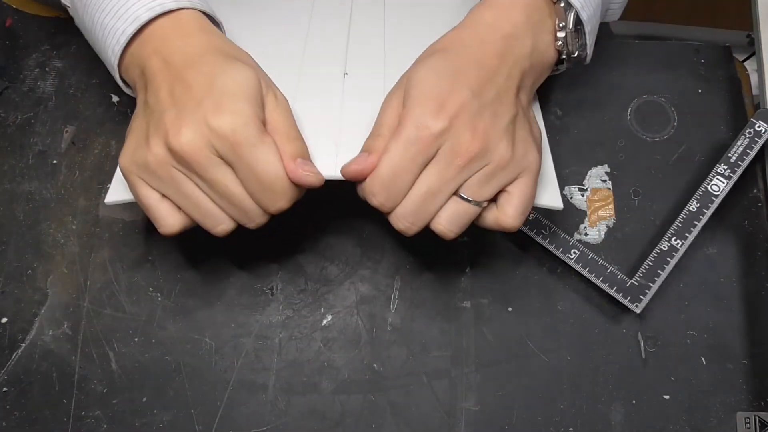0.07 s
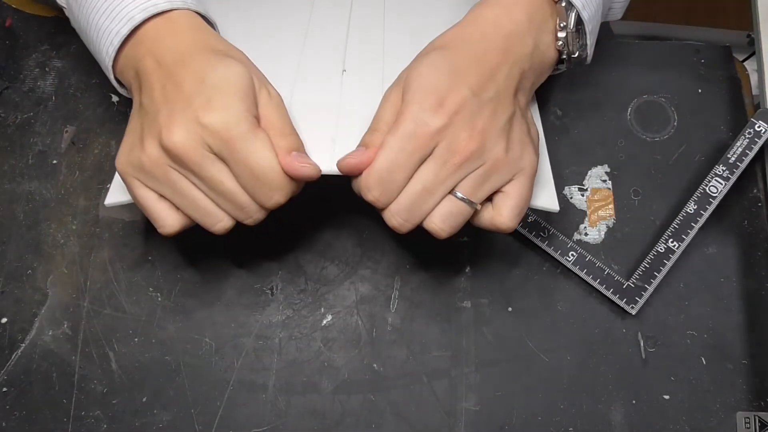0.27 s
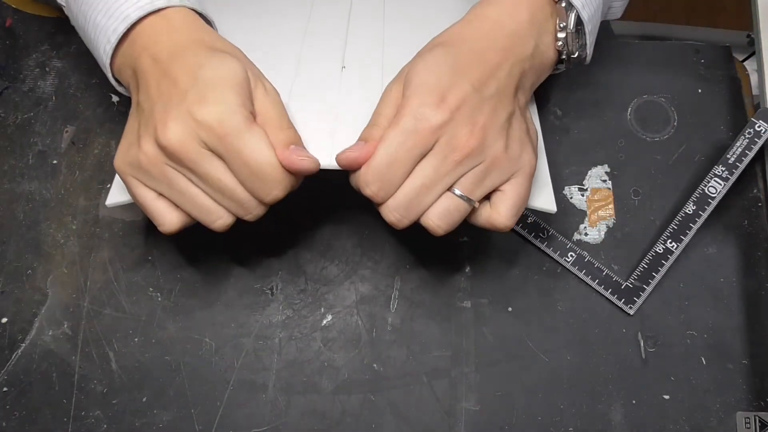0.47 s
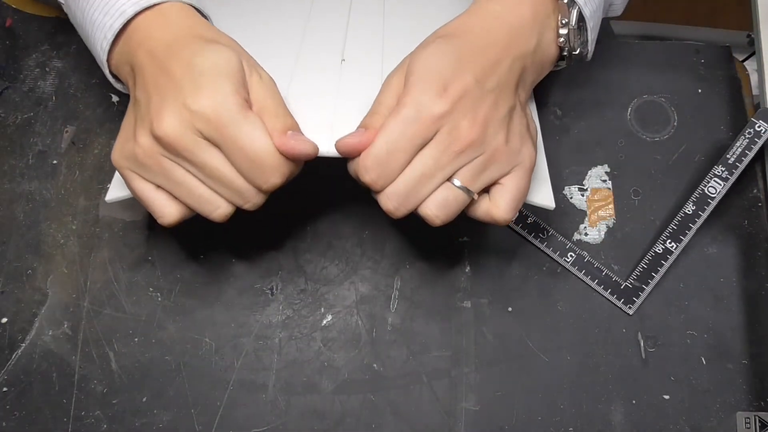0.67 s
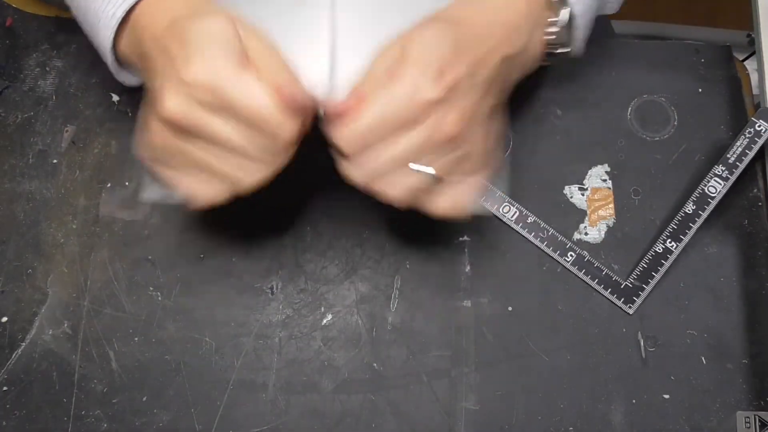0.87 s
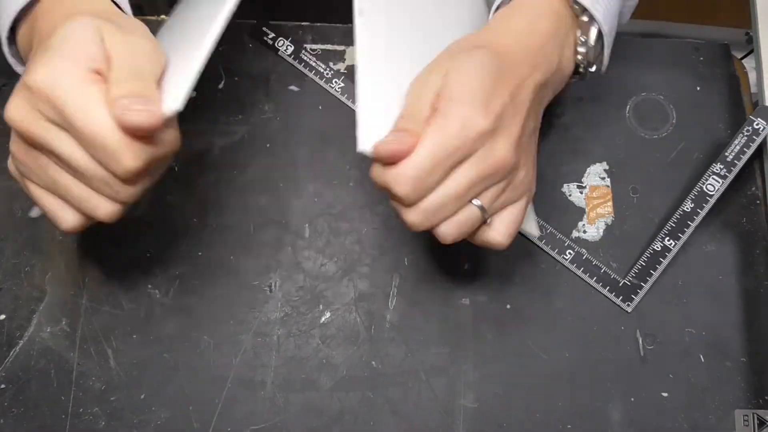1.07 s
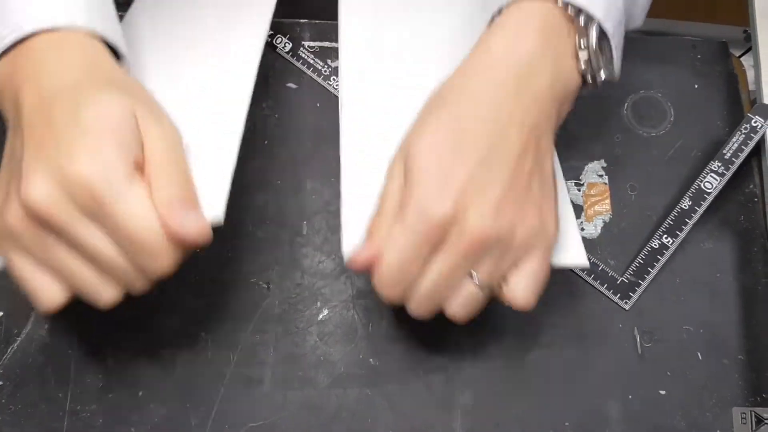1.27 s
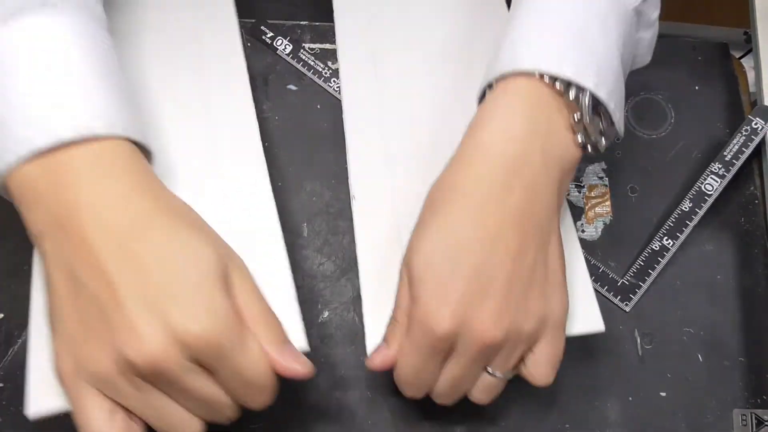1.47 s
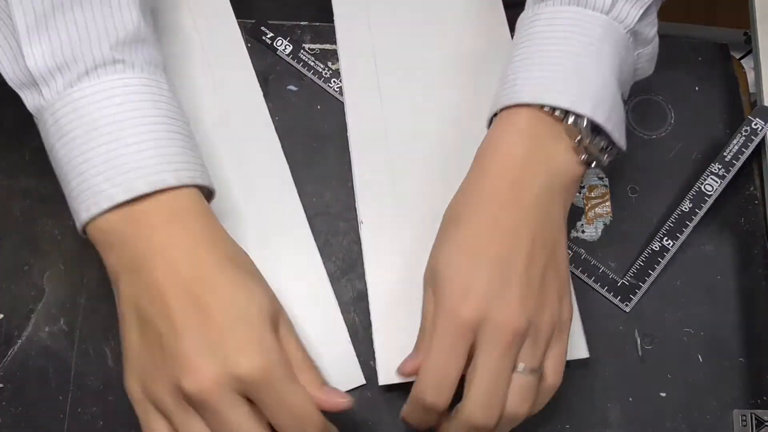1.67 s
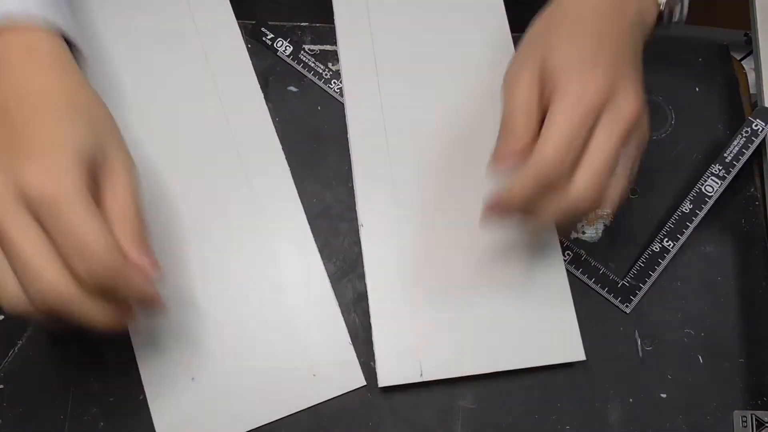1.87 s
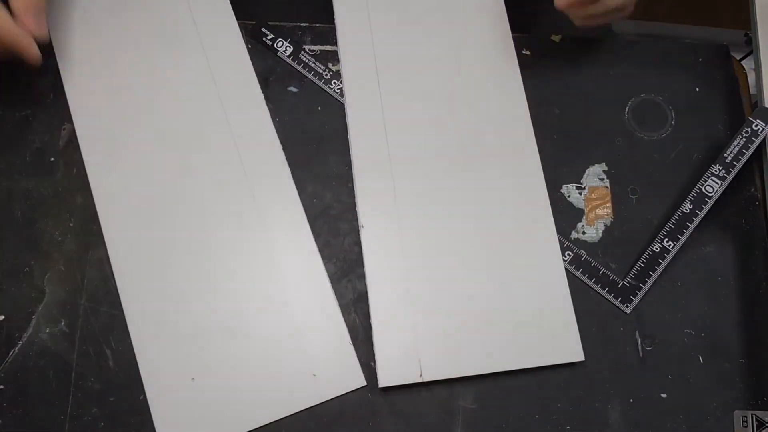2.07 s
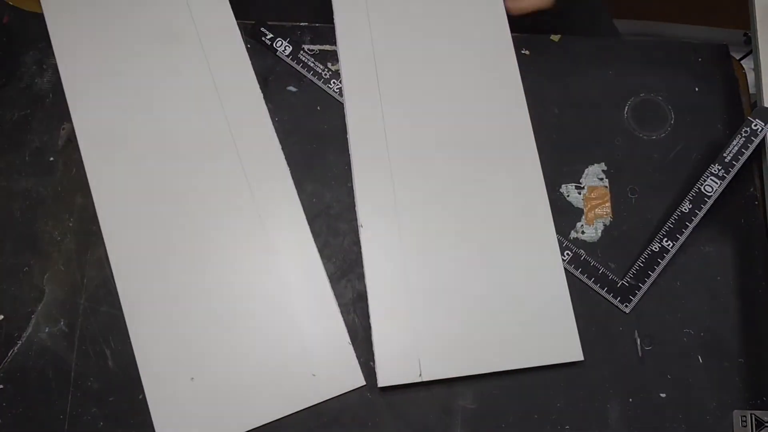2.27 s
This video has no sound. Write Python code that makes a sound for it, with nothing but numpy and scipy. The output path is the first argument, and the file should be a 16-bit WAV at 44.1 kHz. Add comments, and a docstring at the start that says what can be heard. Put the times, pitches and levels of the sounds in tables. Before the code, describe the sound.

A stiff plastic sheet snaps in two by hand, then its halves clatter onto a table

```python
"""First a crackling knock and a thump, over a low room hush with a fan tone: hands flex a scored plastic sheet
over a work table. It creaks, snaps in two, and the halves are laid down, slide and clatter flat.
Each contact is a short burst of noise that also rings the sheet and thumps the table; every ring is a set of
fading sine tones. Rubbing and hush are shaped noise, and a small room adds a short tail."""
import sys
import numpy as np
from scipy import signal
from scipy.fft import rfft, irfft
from scipy.io import wavfile
from scipy.ndimage import uniform_filter1d

SR = 44100
rng = np.random.default_rng(int(sys.argv[2]) if len(sys.argv) > 2 else 0)


def boost_factor(decibels):
    """Convert a level in decibels to a linear amplitude factor."""
    exponent = np.asarray(decibels, float) / 20
    return 10 ** exponent


def wav_out(sig):
    """Save sig, one row per channel (or a flat mono array), as 16-bit PCM at SR to the path in sys.argv[1]."""
    wavfile.write(sys.argv[1], SR, np.round(np.clip(np.atleast_2d(sig).T, -1, 1) * 32767).astype(np.int16))


N = 101826  # length in samples


def level(x, db):
    """Scale to an rms (average power) level."""
    return x * boost_factor(db) / np.sqrt(np.mean(x ** 2))


def fit(x, db):
    """Scale a short sound so that its mid channel has this level as if all its energy fell within 10 ms."""
    return x * boost_factor(db) / np.sqrt(np.sum(x[0] ** 2) / (SR / 100))


def colour(x, table, share=1):
    """Filter by a curve of (pitch_hz, level_db) points, joined on a log pitch axis; share scales the dB."""
    hz, db = np.array(table).T
    f = np.fft.rfftfreq(x.shape[-1], 1 / SR) + 1
    curve_db = np.interp(np.log(f), np.log(hz), db)
    return irfft(rfft(x) * boost_factor(share * curve_db), x.shape[-1])


def walk(rate_hz):
    """Smooth random drift, spread near 1: white noise averaged twice."""
    k = int(SR / rate_hz)
    smooth = uniform_filter1d(uniform_filter1d(rng.standard_normal(N), k), k)
    return np.sqrt(3 * k / 2) * smooth


# how strong the hush is at each pitch: pitch_hz, level_db (per Hz)
HUSH_COLOUR = [(15, -25), (25, -7.5), (64, -21.5), (92, -7.5), (149, -6.5), (242, -15.5), (277, -15),
               (384, -6), (575, -16.5), (2690, -36), (6200, -40), (8200, -36), (12200, -34), (14800, -33),
               (16000, -48)]
HUSH_DB, HUSH_SIDE_DB = -68, -4.5  # rms before the bass swells; extra gain of the side channel
BASS_SWELL_DB, BASS_BELOW_HZ = 5, 247
FAN_HZ, FAN_WIDTH_HZ, FAN_DB = 374.8, 31, -71


def air():
    """Steady hush with a swelling bass, plus a fan tone that wavers as it is narrow noise; as mid and side."""
    hush = level(colour(rng.standard_normal((2, N)), HUSH_COLOUR), HUSH_DB)
    bass = signal.sosfilt(signal.butter(2, BASS_BELOW_HZ, fs=SR, output="sos"), hush)
    hush = hush + bass * (boost_factor(BASS_SWELL_DB * walk(15)) - 1)
    hush[1] *= boost_factor(HUSH_SIDE_DB)
    b, a = signal.iirpeak(FAN_HZ, FAN_HZ / FAN_WIDTH_HZ, fs=SR)
    fan = signal.lfilter(b, a, signal.lfilter(b, a, rng.standard_normal(N)))
    hush[0] += level(fan, FAN_DB)
    return hush


# how long the room rings at each pitch: pitch_hz, t60_s (time to fade by 60 dB)
ROOM_FADE = [(120, 0.44), (300, 0.16), (800, 0.18), (2000, 0.16), (5000, 0.14), (12000, 0.04)]
ROOM_DB, ROOM_SIDE_DB = -12.5, -6.5  # tail against the near sound; side against mid
ROOM_BUILD_S = 0.0017


def room(x):
    """Scattered reflections: noise in overlapping bands that fade at their own rates; as mid and side."""
    t = np.arange(SR // 2) / SR
    hz, t60 = np.array(ROOM_FADE).T
    noise = rfft(rng.standard_normal((2, len(t))))
    log_f = np.log(np.fft.rfftfreq(len(t), 1 / SR) + 1)
    tail = 0
    for k in range(len(hz)):
        band = np.interp(log_f, np.log(hz), np.eye(len(hz))[k])
        tail = tail + irfft(noise * band, len(t)) * 1000. ** (-t / t60[k])
    tail = tail * np.minimum(t / ROOM_BUILD_S, 1) ** 2
    gain = boost_factor(np.array([[ROOM_DB], [ROOM_DB + ROOM_SIDE_DB]]))
    tail = tail / np.sqrt(np.sum(tail[0] ** 2)) * gain
    return signal.fftconvolve(x[None], tail, axes=1)[:, :N]


MODE_SCATTER_DB, DETUNE = 1.5, 0.022  # random spread of loudness; pitch spread as a fraction
BODY_SIDE_DB = -17.5  # scales the random side share of each tone


def ring(push, modes, chance, t):
    """A push sounds three close tones around each mode, newly tuned each time; as mid and side."""
    hz, db, t60 = np.repeat(np.array(modes), 3, axis=0).T[:, :, None]
    size, tune, side = chance[:, :len(hz), None]
    place = np.arange(len(hz))[:, None] % 3 - 1 + tune / 2
    tone = np.sin(2 * np.pi * (hz * (1 + DETUNE * place) * t + place / 4))
    bell = boost_factor(db + MODE_SCATTER_DB * size) * tone * 1000. ** (-t / t60)
    both = np.array([bell.sum(axis=0), boost_factor(BODY_SIDE_DB) * (side * bell).sum(axis=0)])
    return signal.fftconvolve(push[None], both, axes=1)[:, :len(t)]


# halves and fingers slide over the table: start_s, rumble_db, hiss_db, rattle_db (silent before the first row)
SLIDES = [(1.1, -95, -78, -81), (1.158, -61, -56, -82), (1.25, -66.5, -76.5, -81),
          (1.332, -70.5, -80, -102), (1.36, -85, -61, -72), (1.399, -80, -62, -66),
          (1.422, -97.5, -91, -99), (1.47, -103, -89, -99), (1.49, -91, -73, -91), (1.58, -93, -87, -90),
          (1.6, -62, -65, -84), (1.649, -63.5, -66.5, -66.5), (1.7, -62, -65.5, -69),
          (1.78, -67, -64.5, -77), (1.822, -60.5, -62.5, -82), (1.902, -65.5, -74, -90),
          (1.95, -52.5, -76, -56), (2.02, -60.5, -72, -49), (2.08, -63.5, -80, -69.5),
          (2.201, -52, -68, -50.5), (2.31, -66.5, -76, -60)]
# tone of the rumble in the table: pitch_hz, level_db
RUMBLE_COLOUR = [(60, 7.5), (150, 6.5), (350, 9.5), (700, 0), (1400, -1.5), (2500, -20), (6000, -47)]
# tone of the hiss at the surface: pitch_hz, level_db
HISS_COLOUR = [(800, -19), (2500, -2), (5500, -2), (9500, 1), (13000, 4), (15000, -12), (20000, -25)]
# tones of a sheet half lying flat, rattling here and clattering later: pitch_hz, level_db, t60_s (at full length)
FLAT_SHEET = [(800, -12, .03), (1060, -9, .04), (1290, -9, .03), (1440, 1, .065), (1520, -3, .04),
              (1880, -9, .025), (2060, -7, .03), (2400, -11, .02), (2880, -12, .015), (3600, -9, .02),
              (4400, -14, .008), (5400, -13, .01)]
SLIDE_FLICKER_DB, SLIDE_GRIT_DB = 2.5, 2.2  # slower and faster random changes of strength
NEAR_SIDE_DB = -6  # side gain of rumble and hiss


def slide():
    """Gritty rubbing: rumble in the table, hiss at the surface, rattle of the flat sheet; as mid and side."""
    start, *dbs = np.array(SLIDES).T
    t = np.arange(N) / SR
    flicker = boost_factor(SLIDE_FLICKER_DB * walk(52) + SLIDE_GRIT_DB * walk(530))
    grit = rng.standard_normal((3, 2, N)) * flicker
    wide = boost_factor(np.array([[0], [NEAR_SIDE_DB]]))
    rumble = wide * colour(grit[0], RUMBLE_COLOUR)
    hiss = wide * colour(grit[1], HISS_COLOUR)
    rattle = ring(grit[2, 0], FLAT_SHEET, rng.standard_normal((3, 64)), t)
    out = 0
    for part, db in zip((rumble, hiss, rattle), dbs):
        out = out + level(part, 0) * boost_factor(np.interp(t, start, db, left=-np.inf))
    return out


# weight lands on the table: start_s, level_db, contact_s
THUDS = [(0.016, -41, 0.0016), (0.046, -37.5, 0.0071), (0.439, -49.5, 0.002), (0.746, -49, 0.0015),
         (0.792, -51, 0.0012), (1.061, -54, 0.0026), (1.155, -49, 0.0022), (1.591, -46, 0.012),
         (1.71, -48.5, 0.0012), (1.907, -35, 0.00091), (2.05, -48.5, .002), (2.093, -46, 0.002),
         (2.185, -38.5, 0.002), (2.241, -49, 0.001)]
# deep tones of the table frame: pitch_hz, level_db, t60_s
TABLE_FRAME = [(70.4, -22.5, 0.016), (103, -32, 0.094), (128, 1, 0.13), (155.2, -8.5, 0.21),
               (198.6, 4.5, 0.04)]


def thuds():
    """Soft, rounded pushes boom in the table frame."""
    t = np.arange(16384) / SR
    out = np.zeros((2, N + len(t)))
    for start, db, contact in THUDS:
        push = np.hanning(int(contact * SR) + 3)
        boom = ring(push, TABLE_FRAME, rng.standard_normal((3, 64)), t)
        k = int(start * SR)
        out[:, k:k + len(t)] += fit(boom, db)
    return out[:, :N]


# the parting halves whip opposite ways, pushing air left and pulling it right: start_s, level_db, pitch_hz, t60_s
WHIPS = [(1.0615, -33, 480, 0.015), (1.0857, -36.5, 470, .025)]


def whips():
    """Short low puffs, each a fading sine, heard only as a difference between left and right."""
    t = np.arange(N) / SR
    out = 0
    for start, db, hz, t60 in WHIPS:
        age = np.maximum(t - start, 0)
        puff = np.sin(2 * np.pi * hz * age) * 1000. ** (-age / t60)
        out = out + fit(puff[None], db)[0]
    return out


BLOW_DB = 0  # single push against the noise around it, for the most sudden contacts
SOFT_RISE_S = 0.0022  # contacts that swell longer than this have little blow
EVEN_HZ = 120  # width over which the push is evened out


def with_blow(push, rise):
    """One clean blow at the height of a sudden contact; the push drives all modes about evenly."""
    size = boost_factor(BLOW_DB) / (1 + (rise / SOFT_RISE_S) ** 2) * np.sqrt(np.sum(push ** 2))
    blow = size * (np.arange(len(push)) == int(rise * SR))
    spectrum = rfft(push + blow)
    power = uniform_filter1d(np.abs(spectrum) ** 2, int(EVEN_HZ * len(push) / SR))
    even = irfft(spectrum / np.sqrt(power), len(push))
    return even * (np.arange(len(push)) < len(push) / 2)


# tone of the crackle: pitch_hz, level_db
CRACKLE_COLOUR = [(250, -48), (700, -4), (1500, 4), (3000, -3), (4800, 1.5), (6200, -2), (7800, 3.5),
                  (10500, 3.5), (13000, -5), (15800, -14), (20000, -20)]
# louder crackles are brighter: pitch_hz, gain_db (per dB of crackle level above -45 dB)
BRIGHTEN = [(9000, 0), (14000, 0.4159)]
# extra tone of the crackle's side channel: pitch_hz, side_against_mid_db
CRACKLE_SIDE = [(1500, -9.5), (13000, -5)]
GRIT_DB = 2.5  # random spread of crackle strength, redrawn every 32 samples


def contacts(rows, sheet, table, share, lag):
    """Crackle, sheet ring and table thump of each contact; share scales ring times, lag (s) delays the thump."""
    t = np.arange(8192) / SR
    out = np.zeros((2, N + 2 * len(t)))
    table = [(hz, db, t60 * share) for hz, db, t60 in table]
    for start, crack_db, ring_db, tilt_db, thump_db, rise, decay in rows:
        noise = rng.standard_normal((4, len(t)))
        chance = rng.standard_normal((2, 3, 64))
        shape = np.minimum(t / rise, 1) ** 2 * np.exp(-np.maximum(t - rise, 0) / decay)
        grit = shape * boost_factor(GRIT_DB * np.repeat(noise[2, ::32], 32))

        crack = colour(noise[:2] * grit, CRACKLE_COLOUR)
        crack = colour(crack, BRIGHTEN, crack_db + 45) * (t < t[-1] * 3 / 4)
        crack = np.array([crack[0], colour(crack[1], CRACKLE_SIDE)])

        # the tilt counts octaves from the sheet's lowest mode
        struck = [(hz, db + tilt_db * np.log2(hz / sheet[0][0]), t60 * share) for hz, db, t60 in sheet]
        sheet_ring = ring(with_blow(noise[0] * grit, rise), struck, chance[0], t)

        thump = ring(with_blow(shape * noise[3], rise), table, chance[1], t)
        thump = np.roll(thump, int(lag * SR), axis=1)

        k = int(start * SR)
        out[:, k:k + len(t)] += fit(crack, crack_db) + fit(sheet_ring, ring_db) + fit(thump, thump_db)
    return out[:, :N]


# palms lay the halves down:
# start_s, crackle_db, sheet_ring_db, ring_tilt_db (per octave), table_thump_db, rise_s, crackle_decay_s
LANDINGS = [(1.5895, -48.5, -45, 9.5, -39, 0.0011, 0.0029), (1.677, -65, -58.5, 1, -66, 0.0028, 0.0043),
            (1.71, -49, -39.5, 4.5, -54, 0.00023, 0.0023), (1.765, -57, -53.5, 1.5, -51.5, 0.00153, 0.0054),
            (1.817, -76, -51, 0.5, -55.5, 0.0013, 0.012)]
# tones of the sheet held bent, for landings and cracks: pitch_hz, level_db, t60_s (at full length)
BENT_SHEET = [(649.4, -3.5, 0.036), (720.6, -8.5, 0.13), (816, -2, 0.066), (904, -2.5, 0.052),
              (1011, -10, 0.098), (1216, 6, 0.014), (1353, -3, 0.032), (1569, -10.5, 0.061),
              (1684, -14.5, 0.053), (1960, -6.5, 0.017), (2253, -8.5, 0.03), (2960, -3.5, 0.0026),
              (3460, -8, 0.017)]
# tones of the table top, for landings and cracks: pitch_hz, level_db, t60_s (at full length)
TABLE_TOP = [(242, -8.5, 0.057), (278, -6, 0.14), (343, 0.5, 0.095), (415, 13, 0.042), (501, 7, 0.033),
             (600, -4, 0.042)]


def landings():
    """Palms damp the halves as they land, so the rings are cut to 0.4 of their length."""
    return contacts(LANDINGS, BENT_SHEET, TABLE_TOP, share=0.4, lag=0.00037)


# loose halves clatter on the table:
# start_s, crackle_db, sheet_ring_db, ring_tilt_db (per octave), table_thump_db, rise_s, crackle_decay_s
TAPS = [(1.842, -50, -53.5, -39, -58, 0.009, 0.0067), (1.9095, -54.5, -45.5, 2.5, -42.5, 0.00068, 0.0036),
        (1.927, -29.5, -36, -7, -77, 0.00094, 0.0045), (1.947, -34.5, -66, 4, -76, 0.0006, 0.0073),
        (1.968, -49, -43.5, 10, -47, 0.0018, 0.011), (1.993, -43, -49, 6, -67, 0.0017, 0.013),
        (2.045, -44, -45.5, 9, -45, 0.0041, 0.0071), (2.094, -50.5, -50, 10, -51.5, 0.00066, 0.0054),
        (2.127, -37.5, -33, 5, -49.5, 0.00054, 0.0061), (2.15, -64, -46.5, 4, -61, 0.0015, 0.01),
        (2.173, -34, -36.5, 6, -47.5, 0.00216, 0.012), (2.186, -48, -41, 13, -43.5, 0.0024, 0.012),
        (2.234, -42, -36, 7, -58, 0.00039, 0.0032), (2.244, -58, -45.5, 14.5, -54, 0.00057, 0.0036),
        (2.267, -50, -47, 8, -69, 0.00073, 0.01), (2.29, -65, -47.5, 2.5, -62, 0.0012, 0.0052)]
# tones of the table with the halves on it: pitch_hz, level_db, t60_s (at full length)
LOADED_TABLE = [(226, -2, .06), (341.5, 3, 0.14), (380, 1, 0.048), (550, -12, 0.037)]


def clatter():
    """The flat halves tap the loaded table and ring almost freely."""
    return contacts(TAPS, FLAT_SHEET, LOADED_TABLE, share=0.83, lag=0.00353)


# the sheet in the hands creaks, knocks and cracks:
# start_s, crackle_db, sheet_ring_db, ring_tilt_db (per octave), table_thump_db, rise_s, crackle_decay_s
CRACKS = [(.0, -62.5, -50, -3.5, -44.5, 0.00067, 0.022), (.018, -36.5, -35, 4, -35, 0.0012, 0.006),
          (.0385, -37, -35, 7, -42, 0.0036, 0.0043), (.049, -48, -37.5, -10, -45.5, 0.0046, 0.018),
          (.128, -69.5, -68, 5, -61, 0.0012, 0.00074), (.151, -67.5, -53, 2.5, -58.5, 0.0025, 0.0067),
          (.237, -74.5, -56, -1.5, -58, 0.0023, 0.0024), (.431, -50, -47.5, 0.5, -43.5, 0.0097, 0.0017),
          (.739, -56.5, -43.5, 3, -42.5, 0.00062, 0.0053), (.747, -74, -45, -21, -44.5, 0.015, 0.015),
          (.787, -68, -46.5, 3, -43.5, 0.001, 0.012), (1.0605, -26.5, -28, -5, -47.5, 0.00048, 0.0037),
          (1.063, -38.5, -30, -2, -48, 0.0022, .007), (1.068, -28.5, -42.5, 11, -66, 0.013, 0.021),
          (1.08, -32, -30.5, 7, -35, 0.0083, 0.006), (1.1425, -61, -40, -2, -52, 0.0004, 0.0022),
          (1.151, -47.5, -45, 9, -54, 0.0012, 0.0046), (1.157, -49, -38, -3, -50, .006, 0.009),
          (1.2, -57.5, -52, -10, -50.5, 0.0045, 0.0079), (1.23, -62.5, -64.5, 21, -65, 0.0026, 0.0037),
          (1.26, -63, -56.5, 8.5, -69, 0.0016, 0.0072), (1.297, -61.5, -60, 4, -57.5, 0.00085, 0.0065),
          (1.345, -51, -42, 8.5, -68, 0.00091, 0.0069), (1.476, -67.5, -63.5, 5.5, -68, 0.0011, .008)]


def cracks():
    """The bent sheet crackles and rings in the hands while the table top thumps."""
    return contacts(CRACKS, BENT_SHEET, TABLE_TOP, share=0.98, lag=0.00353)


# balance of the two channels: pitch_hz, left_minus_right_db
LEFT_OVER_RIGHT = [(60, -2), (400, -1), (1000, 0.65), (8000, 1.5), (13000, -1)]
RADIATES_ABOVE_HZ = 104  # the near sounds are weak below this


def scene():
    """Contacts and rubbing close by, their room tail and the hush; as left and right."""
    near = cracks() + landings() + clatter() + thuds() + slide()
    near[1] += whips()
    low_cut = signal.butter(2, RADIATES_ABOVE_HZ, "high", fs=SR, output="sos")
    near = signal.sosfilt(low_cut, near)
    mid, side = near + room(near[0]) + air()
    left = colour(mid + side, LEFT_OVER_RIGHT, 1 / 2)
    right = colour(mid - side, LEFT_OVER_RIGHT, -1 / 2)
    return np.array([left, right])


def roll_off(x):
    """The treble ends steeply here."""
    return signal.sosfilt(signal.butter(12, 16710, fs=SR, output="sos"), x)


# the very top treble is cut: pitch_hz, level_db
TOP_TREBLE = [(15300, 0), (15900, -20), (20000, -34)]


def record(dry):
    """Dull the very top of the mix and finish it."""
    mix = colour(dry, TOP_TREBLE)
    return roll_off(mix)


dry = scene()
out = record(dry)
wav_out(out)
```